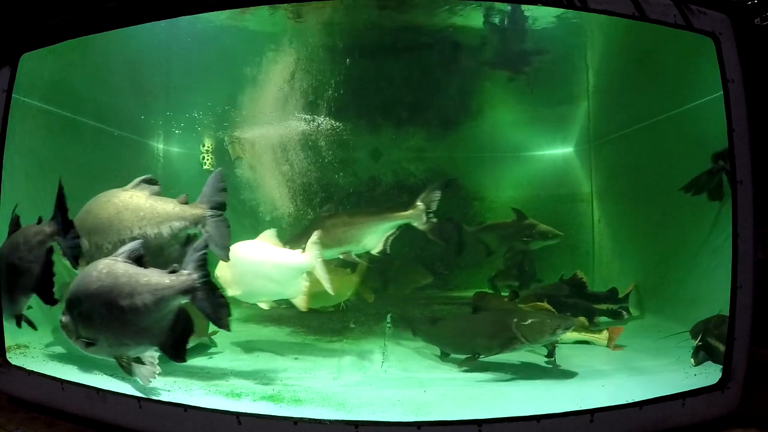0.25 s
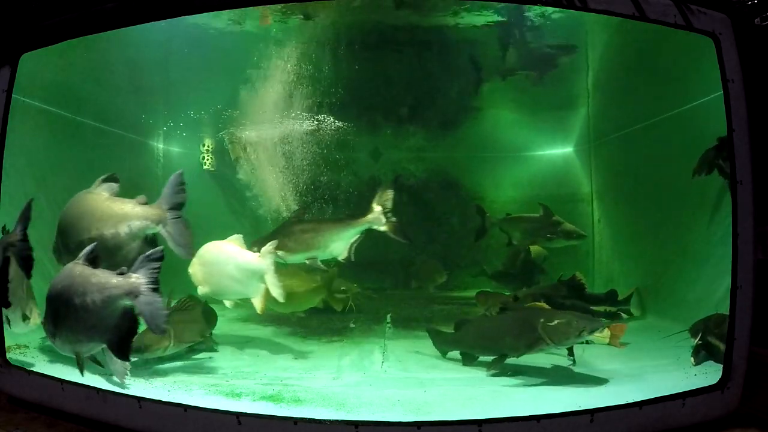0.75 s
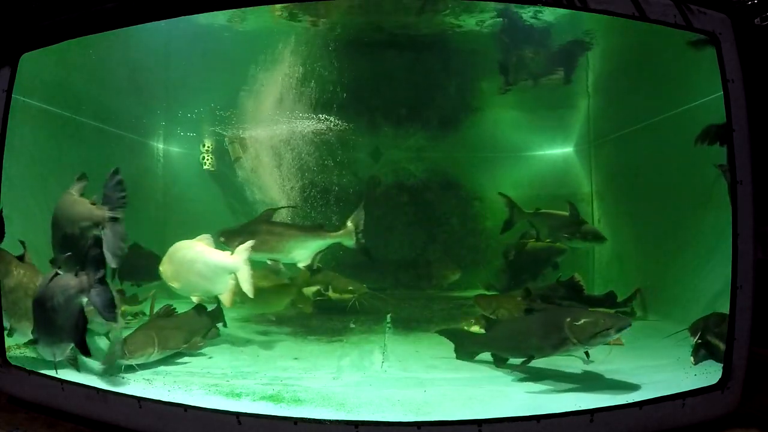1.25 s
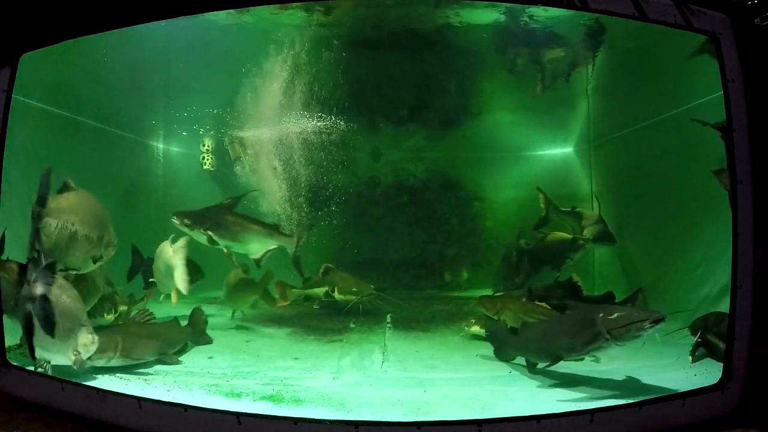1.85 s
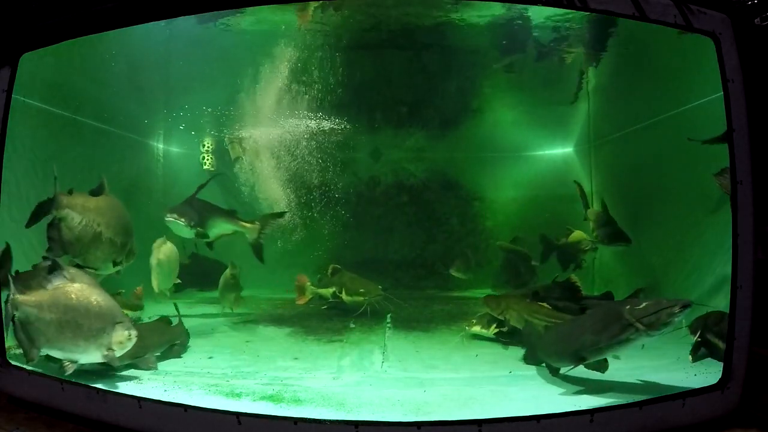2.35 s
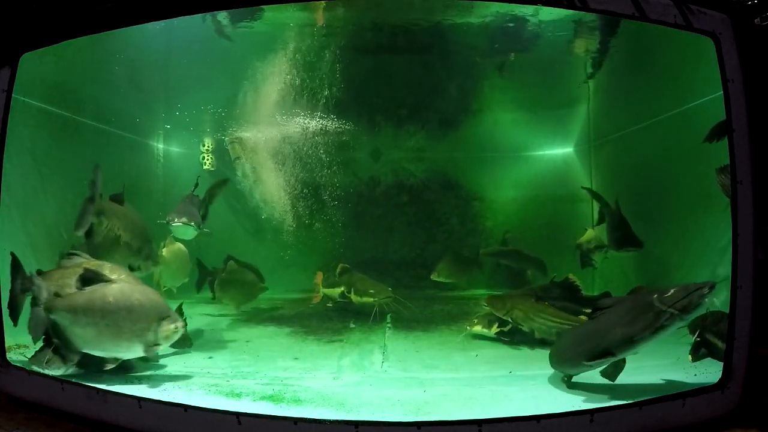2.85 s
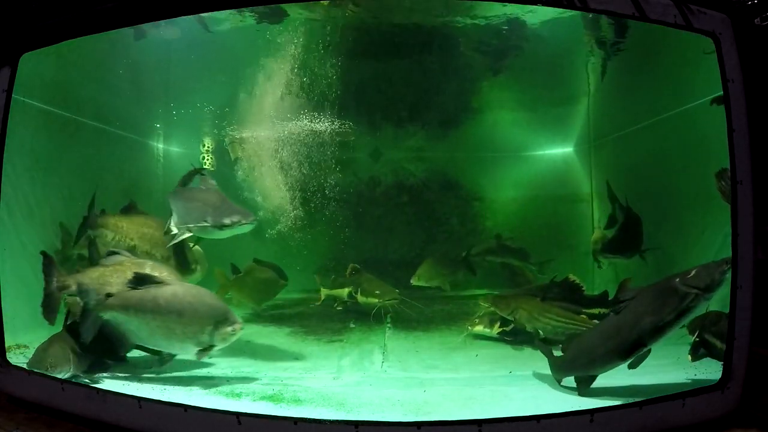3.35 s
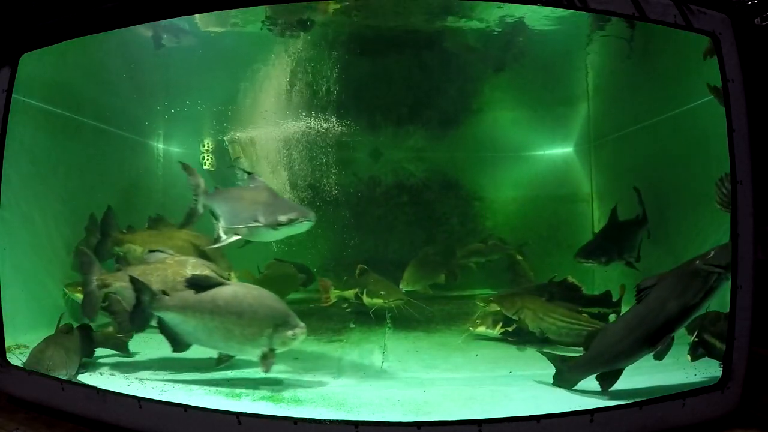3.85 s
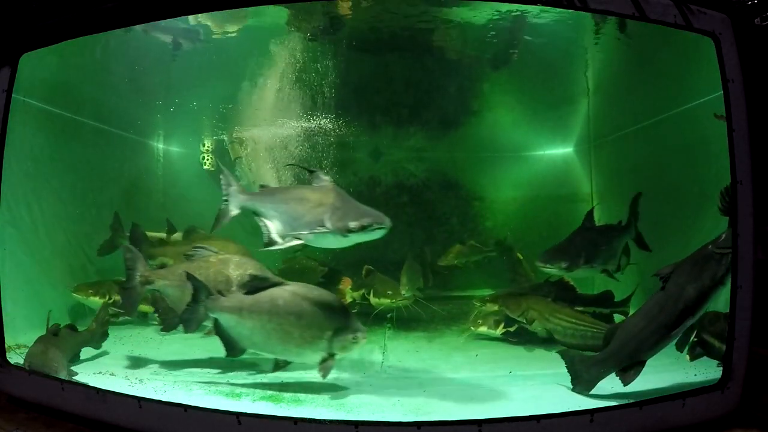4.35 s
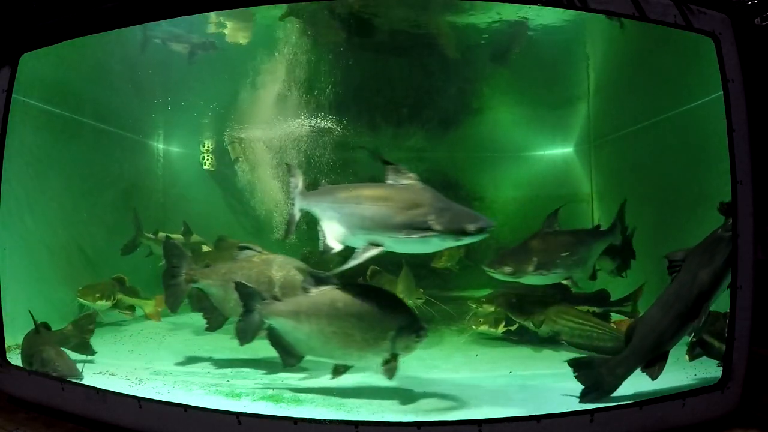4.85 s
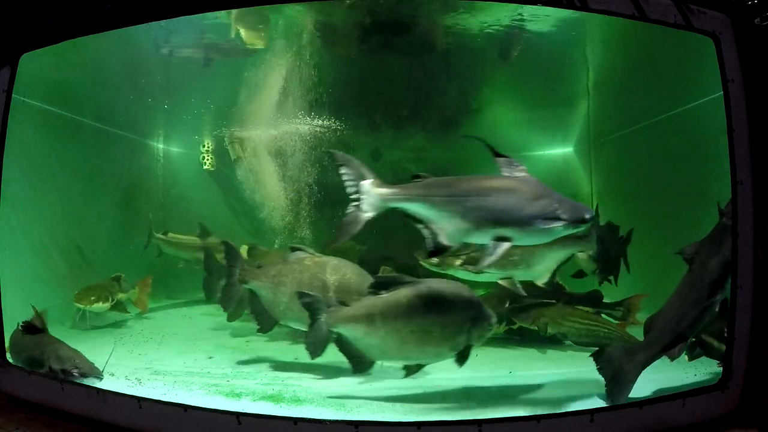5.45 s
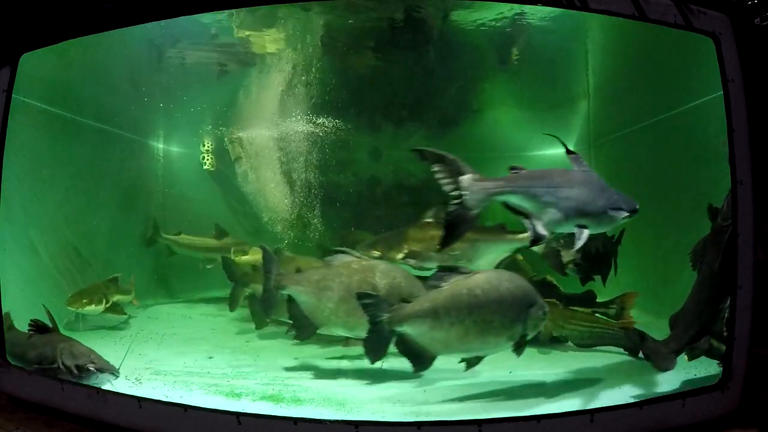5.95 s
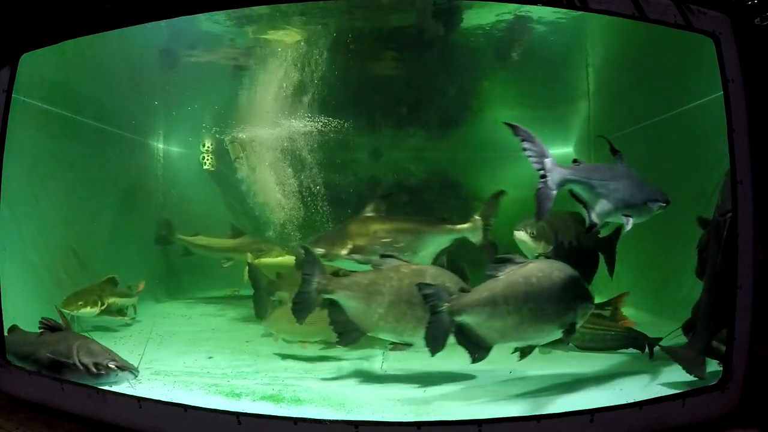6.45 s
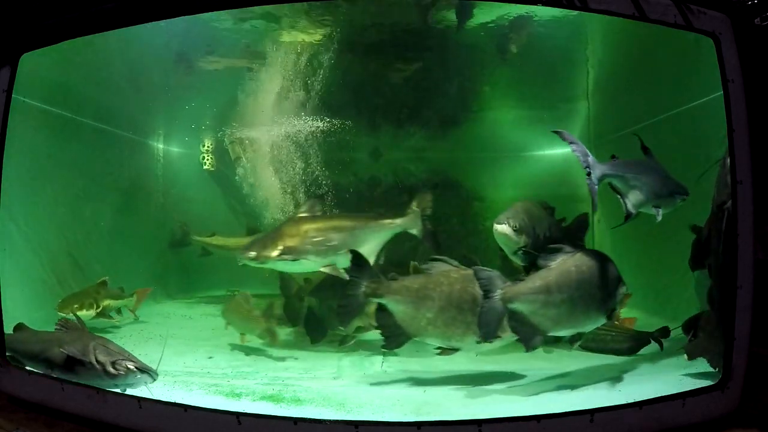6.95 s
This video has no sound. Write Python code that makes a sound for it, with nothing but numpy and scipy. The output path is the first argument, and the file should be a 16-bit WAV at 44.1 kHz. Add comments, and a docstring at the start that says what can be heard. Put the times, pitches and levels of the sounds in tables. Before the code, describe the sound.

A large aquarium runs continuously in a hard-walled indoor space, heard by a fixed stereo microphone. Throughout all seven seconds, a deep pump hum around 57 to 68 hertz dominates, throbbing roughly twice a second, swelling over several seconds and fluttering irregularly about ten times a second as the tank resonates. Its strongest bass peaks are softly held down. Under it, aeration churns as a low watery rumble, with a quieter splashy wash and very faint high fizz of fine bubbles, wide and steady. Thin, wavering motor tones barely show. At about 1.2 s a short light tick sounds. Around 2.8 to 2.9 s a gritty cluster of ticks comes with tiny high squeaks sliding down, slightly to the right. At 5.1 s a small tick is followed at 5.3 s by a more ringing one, left-leaning at first, with a brief room tail. The hum and bubbling then continue unchanged to the end.

```python
"""A hard-walled room with a big aquarium. Four steady pumps, nearly equal in speed, sum to a deep hum that throbs
twice a second and swells every few seconds; the tank's wandering resonance, mostly just above, makes it flutter.
Shaped noise and damped bubble notes make the aeration churn, splash and fizz; drifting sines make motors whine.
A few splashy noise ticks ring in the room, one group with squeaks that slide down in pitch."""
import sys
import numpy as np
from scipy import signal
from scipy.fft import rfft, irfft, next_fast_len
from scipy.io import wavfile
from scipy.ndimage import uniform_filter1d, map_coordinates

SR = 44100
rng = np.random.default_rng(int(sys.argv[2]) if len(sys.argv) > 2 else 0)


def wrap_up_sound(samples):
    """Save the sound to the file named by the first command line argument, as 16-bit audio."""
    columns = np.atleast_2d(samples).T
    # keep every value between -1 and 1, then stretch to whole-number steps
    tamed = np.clip(columns, -1, 1)
    steps = np.round(tamed * 32767).astype(np.int16)
    wavfile.write(sys.argv[1], SR, steps)


N = 317961

# Steady pumps. Each row: speed in Hz, level in dB, time in seconds of a beat crest against the first pump.
PUMP_HZ_DB_S = [(59.164, -17, 0), (57.272, -18.2, .189), (57.046, -22.8, .446), (56.716, -19.1, .269)]
# Path of the tank's resonance. Each row: time in seconds, pitch in Hz, level in dB.
BOOM_S_HZ_DB = [(0.061, 65.8, -16.0), (0.29, 71.49, -33.3), (0.426, 64.83, -19.1), (0.482, 75.32, -22.5),
                (0.537, 60.49, -22.1), (0.631, 67.6, -33.2), (0.707, 68.23, -18.6), (1.177, 66.66, -27.7),
                (1.369, 68.09, -51.8), (1.603, 68.32, -16.3), (1.714, 63.1, -33.2), (2.057, 68.27, -18.3),
                (2.407, 68.44, -22.8), (2.53, 73.48, -37.1), (2.774, 62.87, -32.9), (3.087, 67.85, -20.9),
                (3.459, 67.7, -18.3), (3.741, 68.94, -46.6), (3.813, 62.88, -19.7), (4.101, 69.15, -30.3),
                (4.532, 67.95, -17.8), (4.644, 73.96, -32.2), (4.775, 67.81, -20.0), (5.291, 69.3, -23.6),
                (5.348, 56.88, -23.1), (5.406, 70.35, -17.8), (5.64, 63.73, -24.0), (5.779, 67.32, -23.1),
                (6.341, 63.74, -28.0), (6.626, 71.72, -27.4), (7.08, 70.02, -28.2)]
# Faint motor tones. Each row: pitch in Hz, mean level in dB, random drift in Hz.
WHINE_HZ_DB_HZ = [(28, -43.5, 2), (84.4, -39.5, 3.5), (119.5, -45.5, 1.8), (171.1, -50, 5),
                  (184, -53.5, 3.93), (245, -56, 3), (274, -57, 3), (367, -57, 2), (478, -63, 1),
                  (904, -66.5, 4.1), (974, -58, 3.5)]
# Spectrum of air churning in the water. Each row: frequency in Hz, relative density in dB per Hz.
CHURN_HZ_DB = [(20, -14), (36, -6), (47, 3.5), (60, 13.5), (85, 6), (103, -4), (138, -9), (165, -1),
               (205, -1), (240, -5), (300, -12), (450, -16.5), (800, -22.5), (2000, -71)]
# Spectrum of larger bubbles at the surface. Each row: frequency in Hz, relative density in dB per Hz.
SPLASH_HZ_DB = [(180, -32.5), (300, -6), (460, -0.5), (540, -3.5), (670, -4), (1100, -4), (1400, -6),
                (1750, -7), (2200, -12), (2450, -15.5), (3000, -20.5), (4000, -47.5)]
# Spectrum of the finest bubbles. Each row: frequency in Hz, relative density in dB per Hz.
FIZZ_HZ_DB = [(1500, -21.5), (2300, -1), (3300, 1.5), (4100, -2.5), (4800, -3.5), (5500, -0.5), (6200, 0.8),
              (7500, -3), (8200, -8), (10200, -13.5), (11500, -22), (15000, -32.5)]
# Spectrum shared by the ticks. Each row: frequency in Hz, relative density in dB per Hz.
TICK_HZ_DB = [(1000, -13), (3500, -9), (4800, -4), (6400, -1), (8000, 0.5), (10800, -8), (12500, -19),
              (15000, -27.5)]
# Left-right likeness of the aeration. Each row: frequency in Hz, correlation from -1 to 1.
ALIKE_HZ_CORR = [(110, 0.99), (200, 0.88), (370, 0.78), (690, 0.21), (1260, 0.0049), (2320, 0.1),
                 (4270, 0.43), (7860, -0.33), (14400, 0.18)]
# Ticks. Each row: start in seconds, level in dB, left minus right in dB, dull above in Hz,
# t60 of the snap in seconds, boost of the ring band in dB.
TICK_ROWS = [(1.1552, -29, -2, 10100, .01, 4), (1.165, -43.5, -4, 8500, .09, 6),
             (2.8386, -30, -8, 14900, 0.065, 0), (2.8485, -30, 0, 14000, 0.044, 1),
             (2.868, -35, -5, 11000, 0.09, 1), (2.894, -35.5, -1.5, 10500, 0.098, 2),
             (5.1328, -33, 2, 7500, .012, 3), (5.3015, -34, 6.5, 7500, 0.049, 12),
             (5.313, -37, -1, 7500, .13, 11)]
# Falling squeaks. Each row: start in seconds, start pitch in Hz, level in dB, left minus right in dB, t60 in seconds.
SQUEAK_ROWS = [(2.838, 5130, -40, -2, 0.17), (2.8395, 7950, -38, -9, .03), (2.848, 6680, -34.5, -4, 0.13)]

BOOM_CREST_S = .0096  # first beat crest against the first pump
HUM_LAG_S = 0.00036  # the hum reaches the right channel first
CHURN_DB, SPLASH_DB, FIZZ_DB = -31, -39, -46.5
RING_HZ, RING_WIDTH_HZ = 6060, 560
SQUEAK_FALL_PER_S, SQUEAK_RISE_S = 5, 0.0022  # exponential pitch fall; time constant of the onset
LIMIT_DB, TOP_HZ = -6.8, 15050


def amp(db):
    """Decibels to gain."""
    return 10 ** (np.asarray(db) / 20)


def unit(x):
    """Scale to rms 1."""
    return x / np.sqrt(np.mean(x ** 2) + 1e-20)


def pan(db):
    """Left and right gains for a left-minus-right level difference."""
    return amp([[db / 2], [-db / 2]])


def along(points, hz):
    """Interpolate (Hz, value) points on a log frequency axis."""
    f, v = np.transpose(points)
    return np.interp(np.log(hz + 1), np.log(f + 1), v)


def curve(rows):
    """Interpolate (s, value) points to one value per sample."""
    return np.interp(np.arange(N) / SR, *np.transpose(rows))


def wobble(rate_hz):
    """Smooth random curve with rate_hz knots a second."""
    knots = rng.standard_normal(int(N * rate_hz / SR) + 4)
    return map_coordinates(knots, [np.arange(N) * rate_hz / SR])


def turning(hz):
    """Running phase in radians at hz, from a random start."""
    cycles = np.cumsum(hz * np.ones(N)) / SR
    return 2 * np.pi * (cycles + rng.random())


def filtered(x, response):
    """Multiply the spectrum of x by a response of frequency."""
    m = next_fast_len(N + SR // 2)
    spectrum = rfft(x, m) * response(np.fft.rfftfreq(m, 1 / SR))
    return irfft(spectrum, m)[..., :N]


def diffuse(pair, spectrum):
    """Colour two unrelated signals and mix them as mid and side to the set likeness, rms 1."""
    def response(hz):
        turn = np.arccos(np.clip(along(ALIKE_HZ_CORR, hz), -1, 1)) / 2
        return amp(along(spectrum, hz)) * [np.cos(turn), np.sin(turn)]
    mid, side = filtered(pair, response)
    return unit(np.array([mid + side, mid - side]))


def rush(patchy_db):
    """Two white noises sharing time-frequency patches of random gain, rms 1."""
    z = signal.stft(rng.standard_normal((2, N)), nperseg=512)[2]
    field = uniform_filter1d(rng.standard_normal(z.shape[1:]), size=5, axis=0)
    field = uniform_filter1d(field, size=10, axis=1)
    noise = signal.istft(z * amp(patchy_db * unit(field)), nperseg=512)[1]
    return unit(noise[:, :N])


def bubbles(count, low_hz, high_hz, cycles, spread_db, rise, max_samples=900):
    """Two swarms of damped bubble notes whose pitch rises as they near the surface, rms 1."""
    when, pitch, strength, side = rng.random((count, 4)).T
    hz = (low_hz + (high_hz - low_hz) * pitch)[:, None]
    k = np.arange(int(np.clip(3 * cycles * SR / low_hz, 16, max_samples)))
    age = hz * k / SR / cycles  # in decay times
    gain = amp(-spread_db * np.log(1 - .99 * strength))[:, None] * np.sqrt(hz)
    envelope = np.exp(-age) * (1 - np.exp(-8 * age))
    notes = gain * envelope * np.sin(2 * np.pi * cycles * age * (1 + rise * age))
    start = (when * N).astype(int) + N * (side > .5)  # both channels end to end
    swarm = np.bincount((start[:, None] + k).ravel(), notes.ravel(), 2 * N)
    return unit(swarm[:2 * N].reshape(2, N))


def pumps():
    """Steady hums, as phasors against the first: they add in step and cancel in between."""
    t = np.arange(N) / SR
    lead_hz = PUMP_HZ_DB_S[0][0]
    total = 0
    for hz, db, crest_s in PUMP_HZ_DB_S:
        total = total + amp(db) * np.exp(2j * np.pi * (hz - lead_hz) * (t - crest_s))
    return np.sqrt(2) * total


def tank():
    """Low wandering resonance, as a phasor; it mostly beats about ten times a second with the pumps."""
    s, hz, db = np.transpose(BOOM_S_HZ_DB)
    lead_hz = PUMP_HZ_DB_S[0][0]
    beats = np.cumsum(curve(np.c_[s, hz]) - lead_hz) / SR
    beats -= beats[round(BOOM_CREST_S * SR)]
    return np.sqrt(2) * amp(curve(np.c_[s, db])) * np.exp(2j * np.pi * beats)


def aeration():
    """Rising air churns steadily in the water; larger bubbles splash at the surface, the finest fizz."""
    churn = amp(CHURN_DB + 0.54 * wobble(16)) * diffuse(rng.standard_normal((2, N)), CHURN_HZ_DB)
    plops = bubbles(count=3500, low_hz=698, high_hz=3030, cycles=7.8, spread_db=1.0, rise=0.017)
    splash = diffuse(rush(patchy_db=0.12) + amp(-15) * plops, SPLASH_HZ_DB)
    splash = amp(SPLASH_DB + 0.1 * wobble(6.8)) * splash
    pops = bubbles(count=9000, low_hz=2540, high_hz=12700, cycles=6.0, spread_db=2.0, rise=.01)
    fizz = diffuse(rush(patchy_db=1.0) + amp(-12.5) * pops, FIZZ_HZ_DB)
    fizz = amp(FIZZ_DB + 0.7 * wobble(5.9)) * fizz
    return churn * pan(-.5) + splash * pan(-2.05) + fizz * pan(-0.87)


def ticks(rise_s=0.00098, room_t60_s=0.33, room_db=-1, room_top_hz=9500, grain_db=2, wash_grain_db=2):
    """Gritty noise snap, short or drawn out, plus the room's duller wash; both ring in one narrow band."""
    out = np.zeros((2, N))
    t = np.arange(SR // 2) / SR
    for s, db, side_db, top_hz, snap_t60_s, ring_db in TICK_ROWS:
        snap, wash = amp(db) * rng.standard_normal((2, 2, len(t))) * (1 - np.exp(-t / rise_s))
        snap_decay_db = grain_db * wobble(550)[:len(t)] - 60 * t / snap_t60_s
        snap = snap * pan(side_db) * amp(snap_decay_db)
        wash_decay_db = wash_grain_db * wobble(150)[:len(t)] + room_db - 60 * t / room_t60_s
        wash = wash * np.sqrt(snap_t60_s / room_t60_s) * amp(wash_decay_db)

        def colour(hz):
            ring = ring_db / (1 + ((hz - RING_HZ) / RING_WIDTH_HZ) ** 2)
            return amp(along(TICK_HZ_DB, hz) + ring) / (1 + (hz / top_hz) ** 4)
        tick = filtered(snap, colour)
        tick = tick + filtered(wash, lambda hz: colour(hz) / (1 + (hz / room_top_hz) ** 8))
        start = round(s * SR)
        out[:, start:] += tick[:, :N - start]
    return out


def squeaks(rough=.025):
    """Whistles with random pitch jitter that slide down as they die."""
    out = np.zeros((2, N))
    t = np.arange(SR // 4) / SR
    for s, hz, db, side_db, t60_s in SQUEAK_ROWS:
        jitter = np.array([wobble(900), wobble(900)])[:, :len(t)]
        pitch_hz = hz * np.exp(-SQUEAK_FALL_PER_S * t) * (1 + rough * jitter)
        level = amp(db - 60 * t / t60_s) * (1 - np.exp(-t / SQUEAK_RISE_S)) * pan(side_db)
        whistle = level * np.sin(2 * np.pi * np.cumsum(pitch_hz, axis=1) / SR)
        out[:, round(s * SR):][:, :len(t)] += whistle
    return out


def motors():
    """Thin sines, unsteady in pitch and level."""
    total = 0
    for hz, db, drift_hz in WHINE_HZ_DB_HZ:
        total = total + amp(db + 2.76 * wobble(6)) * np.sin(turning(hz + drift_hz * wobble(12)))
    return np.sqrt(2) * total


def scene():
    """Sum all sources; the pump and tank phasors ride on the first pump's rotation."""
    hum = np.imag((pumps() + tank()) * np.exp(1j * turning(PUMP_HZ_DB_S[0][0])))
    lag_sign = np.array([[-1], [1]])  # half the lag on each channel
    rumble = filtered(hum, lambda hz: np.exp(1j * np.pi * hz * HUM_LAG_S * lag_sign))
    return rumble * pan(-.8) + aeration() + ticks() + squeaks() + motors() * pan(-1)


def record(dry):
    """Softly limit the deep bass by its envelope and cut everything above TOP_HZ."""
    bass = filtered(dry, lambda hz: 1 / (1 + (hz / 95) ** 12))
    swing = np.abs(signal.hilbert(bass.mean(0))) / amp(LIMIT_DB)
    gain = (1 + swing ** 6) ** (-1 / 6)
    return filtered(dry + (gain - 1) * bass, lambda hz: hz < TOP_HZ)


dry = scene()
out = record(dry)
wrap_up_sound(out)
```